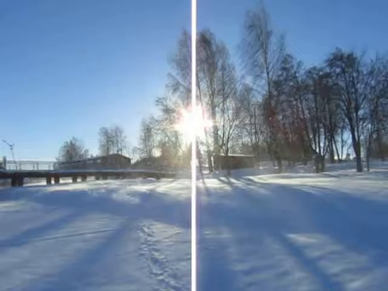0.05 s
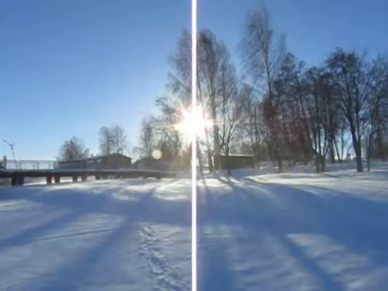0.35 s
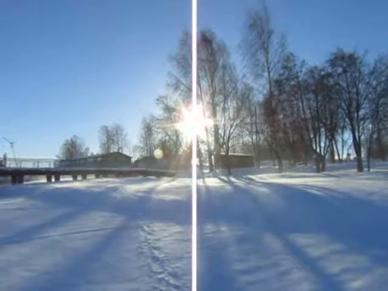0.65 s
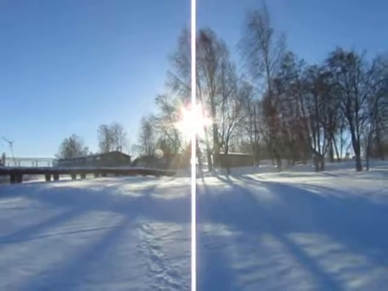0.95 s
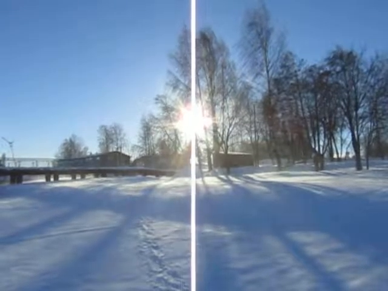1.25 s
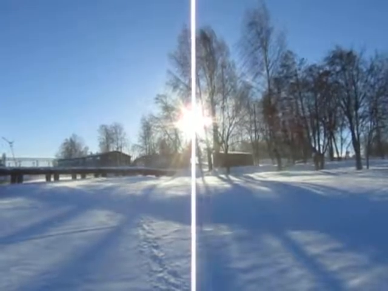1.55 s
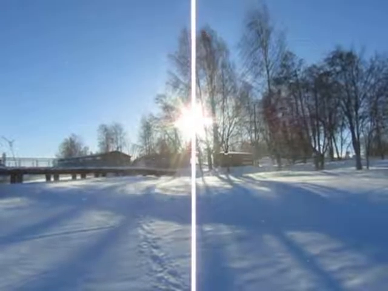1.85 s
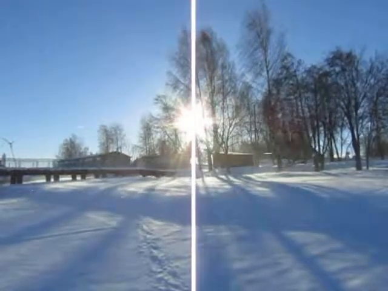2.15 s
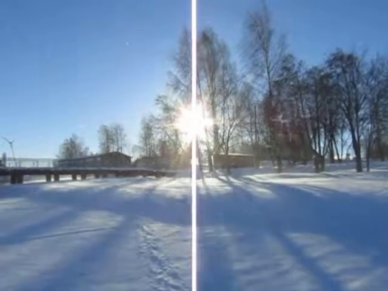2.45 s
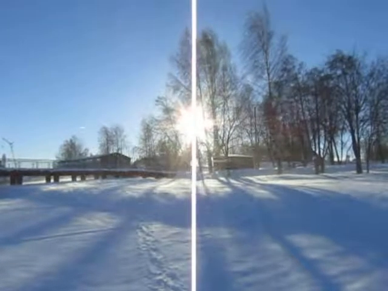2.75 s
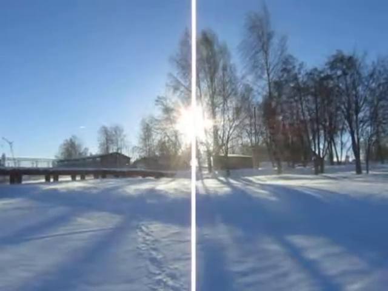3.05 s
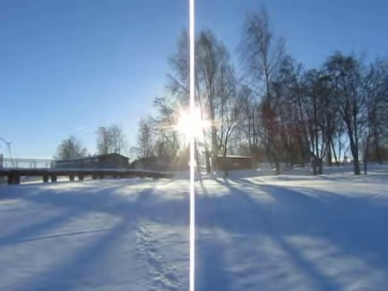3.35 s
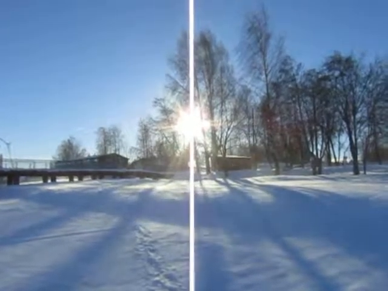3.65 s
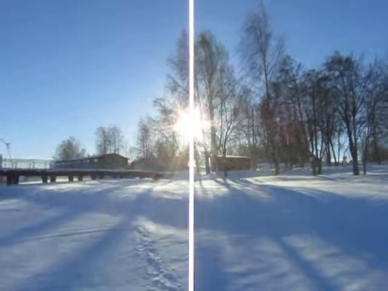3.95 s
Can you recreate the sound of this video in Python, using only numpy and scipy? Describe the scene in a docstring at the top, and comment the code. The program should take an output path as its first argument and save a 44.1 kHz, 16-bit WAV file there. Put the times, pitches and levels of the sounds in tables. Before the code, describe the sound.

Wind roars and flutters against the microphone outdoors, with sharp crackles and thumps.

```python
"""A dull, gusty roar and rumble: wind over an open snowy field buffets a small camera microphone.
Eddies at the port make the roar; faster air tears into a fluttering rasp with sharp crackles.
The hardest eddies land as punches and short blasts, among dry snaps and hollow puffs,
and some choke the microphone for a moment. Faint hiss lies behind."""
import sys
import numpy as np
from scipy import signal
from scipy.fft import rfft, irfft, next_fast_len
from scipy.io import wavfile
from scipy.ndimage import map_coordinates

SR = 44100
rng = np.random.default_rng(int(sys.argv[2]) if len(sys.argv) > 2 else 0)


def bounce(signal):
    """Save signal as a 16-bit WAV file at the path given by the first command-line argument."""
    frames = np.transpose(np.atleast_2d(signal))
    limited = np.clip(frames, -1, 1)
    pcm = np.round(limited * 32767).astype(np.int16)
    wavfile.write(sys.argv[1], SR, pcm)


N = 176400

FLUTTER_HZ, SWAY_HZ = 190, 45
# The bright tone of crackles and snaps. Each row: frequency in Hz, gain in dB.
CRACKLE_EQ = [(200, -7.5), (1400, 5), (2500, 0.5), (5000, -16), (8000, -27.5), (15000, -59.5)]


def amp(db):
    """Decibels to gain."""
    return 10 ** (np.asarray(db) / 20)


def unit(x):
    """Scale to rms 1."""
    return x / np.sqrt(np.mean(x ** 2) + 1e-20)


def wobble(rate):
    """A smooth random curve without extreme peaks, rate knots a second."""
    knots = 2 * np.tanh(rng.standard_normal(int(N * rate / SR) + 4) / 2)
    return unit(map_coordinates(knots, [np.arange(N) * rate / SR]))


def coloured(x, eq):
    """x through a minimum-phase EQ drawn from (Hz, dB) points, at rms 1."""
    size = 2 * next_fast_len(N // 2 + SR // 4)
    hz, db = np.transpose(eq)
    gain = amp(np.interp(np.log(np.fft.rfftfreq(size, 1 / SR) + 1), np.log(hz + 1), db))
    cepstrum = irfft(np.log(gain))
    cepstrum[1:size // 2] *= 2
    cepstrum[size // 2 + 1:] = 0
    return unit(irfft(rfft(x, size) * np.exp(rfft(cepstrum)))[:N])


def noise(eq):
    """Fresh noise of rms 1, shaped by the EQ."""
    return coloured(rng.standard_normal(N), eq)


def swells(rows, order):
    """Summed bumps, steeper at higher order. Each row: middle and half width in seconds, height."""
    t, out = np.arange(N) / SR, np.zeros(N)
    for s, half, height in rows:
        near = slice(*np.searchsorted(t, [s - np.pi * half, s + np.pi * half]))
        out[near] += height * np.exp(-np.abs((t[near] - s) / half) ** order / 2)
    return out


def buffeting(roar_db, rasp_db):
    """The roar opens up into a rasp as the air speeds up; passing eddies shake it all together."""
    # Low roar, upper roar and rasp. Each row: frequency in Hz, gain in dB.
    roar_eq = [(20, -22.5), (80, -12), (170, -3), (480, -0.5), (720, -5.5), (950, -17.5), (1300, -41.5),
               (4000, -68), (9000, -101.5)]
    upper_eq = [(300, -21.5), (650, -1), (850, 2), (1100, 1), (1500, -17.5), (2500, -58.5), (9000, -100)]
    rasp_eq = [(100, -9.5), (500, -3), (950, -1), (1400, -2), (2000, -11.5), (3000, -26), (5000, -39.5),
               (8000, -63.5), (15000, -91.5)]
    flutter, sway = wobble(FLUTTER_HZ), wobble(SWAY_HZ)
    shake = amp(3.5 * flutter)
    roar = amp(roar_db + 1) * unit(shake * noise(roar_eq))
    between_db = roar_db + 0.47 * (rasp_db - roar_db)
    upper = amp(between_db - 2.5) * unit(shake * noise(upper_eq))
    rasp = amp(rasp_db + 3.5) * unit(amp(5.5 * flutter + 3.5 * sway) * noise(rasp_eq))
    return roar + upper + rasp


def rumble(sway_db=5):
    """The largest eddies push slowly on the diaphragm."""
    # The rumble's rise and fall. Each row: time in seconds, level in dB.
    fader = [(0.0, -34), (0.12, -23.5), (0.13, -33.5), (1.059, -30.5), (1.31, -47.5), (1.69, -29.5),
             (1.77, -48), (1.98, -31), (2.12, -29), (2.17, -19), (2.24, -59), (2.35, -19), (2.58, -36),
             (3.06, -24.5), (3.43, -39), (4.0, -24.5)]
    # Its deep tone. Each row: frequency in Hz, gain in dB.
    eq = [(15, -15), (50, -5), (100, -6.5), (170, -4.5), (300, -27.5), (1500, -110)]
    level_db = np.interp(np.arange(N) / SR, *np.transpose(fader))
    return amp(level_db) * unit(amp(sway_db * wobble(SWAY_HZ)) * noise(eq))


def crackle(rasp_db, per_second=110, half_width_s=.0003, spread_db=10):
    """Tiny bursts of very uneven size that come out in fast air."""
    draws = rng.random((int(per_second * N / SR), 2))
    grains = [(when * N / SR, half_width_s, amp(spread_db * size ** 2)) for when, size in draws]
    bursts = swells(grains, order=2) * rng.standard_normal(N)
    level_db = -52 + 1.19 * (rasp_db + 35)  # grows a little faster than the rasp
    return amp(level_db) * coloured(bursts, CRACKLE_EQ)


def hiss(floor_db=-79, grain_db=7.5, grain_hz=260):
    """A faint steady floor, a smooth airy stretch and a few drifts of grainy high sizzle."""
    # Where air and sizzle swell. Each row: middle in seconds, length in seconds, level in dB.
    air_cues = [(.5, .25, -62)]
    sizzle_cues = [(0.803, 0.056, -64.5), (1.695, .1, -68), (1.822, .003, -51.5), (2.47, 0.17, -67),
                   (2.79, 0.22, -68.5), (3.88, 0.19, -62.5)]
    # The three tones of hiss. Each row: frequency in Hz, gain in dB.
    floor_eq = [(2000, 3), (5000, -2), (11500, -9), (15500, -20)]
    air_eq = [(1000, 0), (3500, 0), (6500, -9), (10000, -26)]
    sizzle_eq = [(2000, -26), (6000, -5), (8000, 0), (11500, 2), (13000, -8), (15500, -20)]
    airy = swells([(s, length / 2, amp(db)) for s, length, db in air_cues], order=6)
    drifts = swells([(s, length / 2, amp(db)) for s, length, db in sizzle_cues], order=6)
    sizzle = unit(amp(grain_db * wobble(grain_hz)) * noise(sizzle_eq))
    return amp(floor_db) * noise(floor_eq) + airy * noise(air_eq) + drifts * sizzle


def punches(rise_s=.001, fall_s=.004, centre_hz=484):
    """Broad eddies land suddenly: a rough pressure swing that dies within a few cycles."""
    # Dull punches of air. Each row: start in seconds, relative level in dB.
    cues = [(.006, -8), (0.197, -9.5), (0.237, -6), (0.38, -3.5), (0.630, -12.5), (0.642, -11.5),
            (0.892, -14), (0.978, -13.5), (1.024, -12), (1.078, -11), (1.664, -9.5), (1.850, -14.5),
            (1.885, -14.5), (2.056, -14.5), (2.137, -22), (2.429, -14.5), (2.847, -22), (3.023, -12),
            (3.635, -11), (3.737, -7)]
    # Their roughness. Each row: frequency in Hz, gain in dB.
    eq = [(40, -3.5), (200, 6.5), (500, -6.5), (900, 6), (2200, -28.5), (15000, -92.5)]
    t, out, rough = np.arange(N) / SR, np.zeros(N), noise(eq)
    pitches = centre_hz * np.exp(0.2 * rng.standard_normal(len(cues)))
    for (s, db), hz in zip(cues, pitches):
        near = (t > s) & (t < s + 10 * fall_s)
        age = t[near] - s
        swing = np.sin(2 * np.pi * hz * age) + 0.66 * rough[near]
        envelope = (1 - np.exp(-(age / rise_s) ** 2)) * np.exp(-age / fall_s)
        out[near] += amp(db + 5.5) * envelope * swing
    return out


def snaps():
    """Single dry snaps of air at the port, coloured like the crackle."""
    # The snaps. Each row: start in seconds, peak in dB.
    cues = [(0.014, -12.5), (0.204, -22), (.656, -12), (0.677, -19), (.693, -12), (.805, -19), (.890, -24),
            (.991, -15), (1.703, -32), (1.757, -32.5), (2.52, -13), (2.626, -21), (2.847, -14.5),
            (3.183, -31), (3.215, -31.5), (3.266, -21.5), (3.297, -30.5), (3.339, -29), (3.367, -26),
            (3.4, -31), (3.589, -21), (3.639, -24)]
    snap = coloured(signal.unit_impulse(N), CRACKLE_EQ)
    s, db = np.transpose(cues)
    hits = np.bincount(np.round(s * SR).astype(int), amp(db), N)
    return signal.fftconvolve(hits, snap / np.abs(snap).max())[:N]


def puffs():
    """Short hollow swells of air across the port, each ringing in its own narrow band."""
    # The puffs. Each row: middle in seconds, half width in seconds, pitch in Hz, level in dB.
    cues = [(.074, 0.0038, 1760, -28), (0.151, 0.0031, 1670, -26.5), (2.858, 0.014, 1000, -16),
            (2.973, 0.0054, 1520, -26)]
    out = np.zeros(N)
    for s, half, hz, db in cues:
        band = signal.butter(4, hz * np.exp([-0.24, 0.24]), "bandpass", fs=SR, output="sos")
        hollow = unit(signal.sosfilt(band, rng.standard_normal(N)))
        out += swells([(s, half, amp(db))], order=2) * hollow
    return out


def blasts(tail_s=.0008, tear_hz=600):
    """Hard eddies hit as ragged, steep-fronted bursts; the harder the hit, the more treble it spits."""
    # The hits. Each row: middle in seconds, rough length in seconds, relative level in dB.
    cues = [(0.088, 0.012, -23.5), (0.0916, 0.0015, -15.5), (0.097, 0.0018, -19.5), (0.1134, 0.0023, -21.5),
            (0.132, 0.0035, -25.5), (0.146, 0.0013, -28), (0.2376, 0.0018, -17.5), (0.383, 0.005, -28.5),
            (0.637, 0.0014, -24.5), (0.643, 0.008, -23.5), (0.672, 0.0053, -30.5), (0.705, 0.0059, -19),
            (0.949, 0.007, -15), (1.038, 0.0056, -26.5), (1.08, 0.0045, -24), (1.982, 0.011, -24),
            (2.001, 0.0017, -20), (2.017, 0.0013, -24.5), (2.043, 0.0056, -29), (2.062, 0.0011, -23),
            (2.075, 0.0055, -24.5), (2.104, 0.0068, -26), (2.14, 0.0032, -28.5), (2.174, 0.015, -24.5),
            (2.324, 0.0048, -23.5), (2.339, 0.0037, -16.5), (2.375, 0.013, -19), (2.4, 0.0096, -21),
            (2.433, 0.0081, -22), (2.444, 0.0066, -20), (2.468, 0.0066, -24), (2.503, 0.011, -25),
            (2.559, 0.0069, -29.5), (2.691, 0.0029, -15), (2.709, 0.031, -24), (2.731, 0.0043, -23.5),
            (2.976, 0.0056, -20.5), (3.025, 0.0056, -21), (3.075, 0.00079, -19.5), (3.09, 0.0014, -17),
            (3.747, 0.014, -20), (3.778, 0.011, -26), (3.83, 0.012, -24), (3.951, 0.0054, -19),
            (3.984, 0.0079, -20.5), (3.996, 0.0098, -16)]
    # Full body and bright spit. Each row: frequency in Hz, gain in dB.
    body_eq = [(30, -4), (300, -3), (1100, 0), (2000, -4), (3000, -12), (5000, -24), (8000, -39),
               (15000, -68)]
    spit_eq = [(800, -20), (2500, -2), (4500, 0), (8000, -9), (11000, -19), (15500, -35)]
    early = [(s - tail_s, length, db) for s, length, db in cues]  # offsets the tail's lag
    body = swells([(s, 0.47 * length, amp(db + 5.5)) for s, length, db in early], order=4)
    spit = swells([(s, 0.25 * length, amp(2.7 * (db + 22) - 37.5)) for s, length, db in early], order=4)
    decay = np.exp(-1 / (tail_s * SR))
    body, spit = signal.lfilter([1 - decay], [1, -decay], [body, spit])
    tear = wobble(tear_hz)
    return body * unit(amp(2.5 * tear)) * noise(body_eq) + spit * unit(amp(10 * tear)) * noise(spit_eq)


def choking():
    """A gain that ducks when an eddy chokes the microphone."""
    # The dips. Each row: middle in seconds, length in seconds, depth in dB.
    cues = [(0.119, 0.01, 12), (2.031, 0.011, 20.5), (2.072, 0.0073, 15), (2.077, 0.01, 8),
            (2.129, 0.016, 6), (2.332, 0.0055, 28), (2.39, 0.0032, 37), (2.448, 0.0083, 21),
            (3.971, 0.019, 2.5)]
    return amp(-swells([(s, length / 2, depth) for s, length, depth in cues], order=4))


def scene():
    """A bed of wind, choked now and then, with the hits on top and the hiss behind."""
    # The gusts. Each row: time in seconds, relative roar level in dB, relative rasp level in dB.
    gusts = [(0.0, -20.5, -30), (0.15, -22.5, -30), (0.18, -23, -51.5), (0.256, -20, -21.5),
             (0.312, -21, -53.5), (0.389, -20, -29.5), (0.476, -18.5, -41), (0.507, -11.5, -24),
             (0.531, -20.5, -42.5), (0.642, -14, -31.5), (0.72, -25, -24), (0.759, -21.5, -40),
             (0.871, -22.5, -42.5), (0.94, -16.5, -31.5), (1.086, -21, -32.5), (1.182, -29.5, -59),
             (1.23, -24, -44.5), (1.267, -31, -65.5), (1.572, -26, -59.5), (1.602, -37.5, -94.5),
             (1.673, -21, -33.5), (1.71, -27, -38), (1.78, -21.5, -60), (1.835, -25.5, -53.5),
             (1.918, -19.5, -42), (2.006, -15, -16.5), (2.109, -31, -36.5), (2.162, -14.5, -20),
             (2.188, -21, -29), (2.233, -37, -60), (2.27, -16.5, -51), (2.323, -24, -26.5),
             (2.498, -21.5, -29), (2.589, -23, -35.5), (2.71, -25, -23.5), (2.772, -19, -37),
             (2.864, -20.5, -24.5), (2.918, -20.5, -45.5), (2.976, -20.5, -21.5), (3.007, -20, -42),
             (3.101, -19, -25.5), (3.14, -25, -52.5), (3.295, -20, -36), (3.406, -19, -30.5),
             (3.456, -33.5, -73.5), (3.591, -16.5, -29), (3.71, -21, -45), (3.74, -20, -36.5),
             (3.82, -17, -23), (3.885, -15, -17.5), (3.919, -18.5, -29.5), (4.0, -27, -37)]
    s, roar, rasp = np.transpose(gusts)
    roar_db, rasp_db = (np.interp(np.arange(N) / SR, s, level) for level in (roar, rasp))
    bed = buffeting(roar_db, rasp_db) + rumble() + crackle(rasp_db)
    hits = blasts() + punches() + puffs() + snaps()
    return (choking() * bed + hits + hiss())[None]


def record(dry, ceiling=.95, top_hz=15800):
    """The camera rounds off the highest peaks and keeps nothing above its band limit."""
    rounded = dry / (1 + (dry / ceiling) ** 4) ** (1 / 4)
    size = next_fast_len(N + SR // 2)
    passband = np.fft.rfftfreq(size, 1 / SR) < top_hz
    return irfft(rfft(rounded, size) * passband, size)[..., :N]


dry = scene()
out = record(dry)
bounce(out)
```